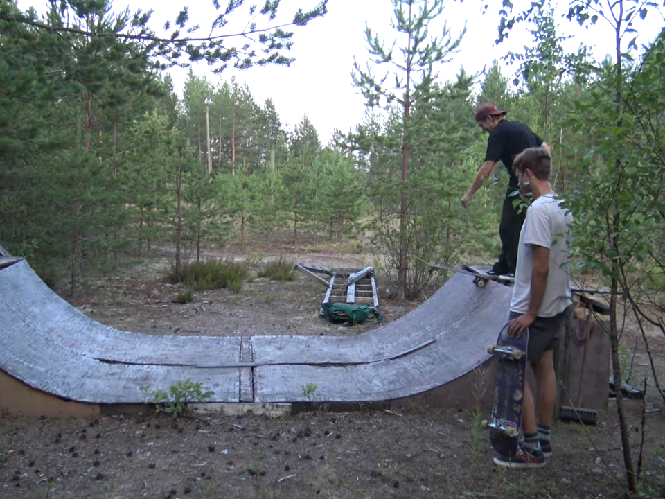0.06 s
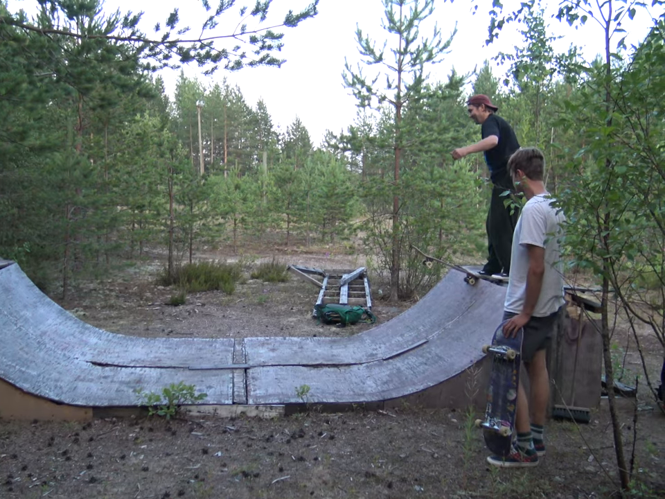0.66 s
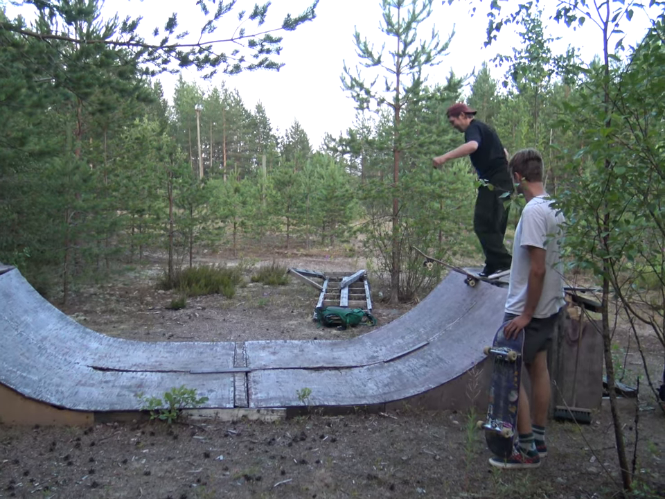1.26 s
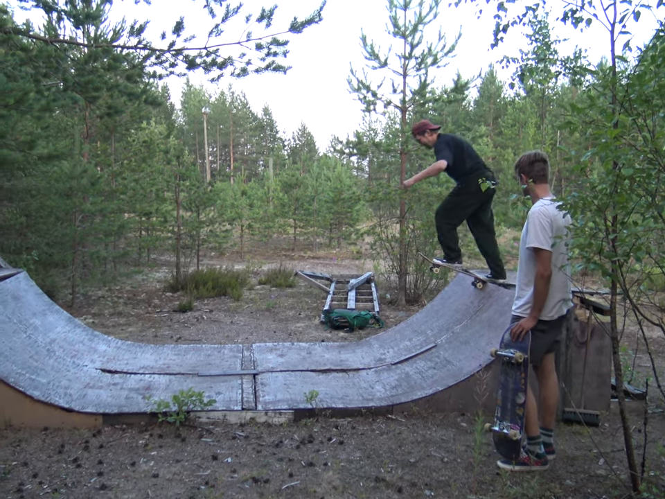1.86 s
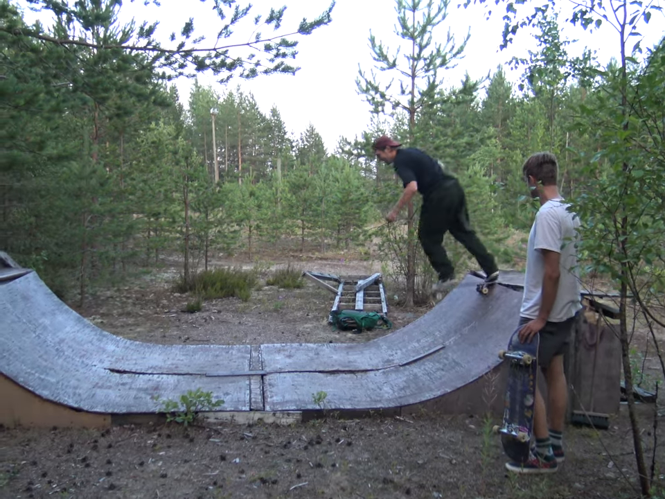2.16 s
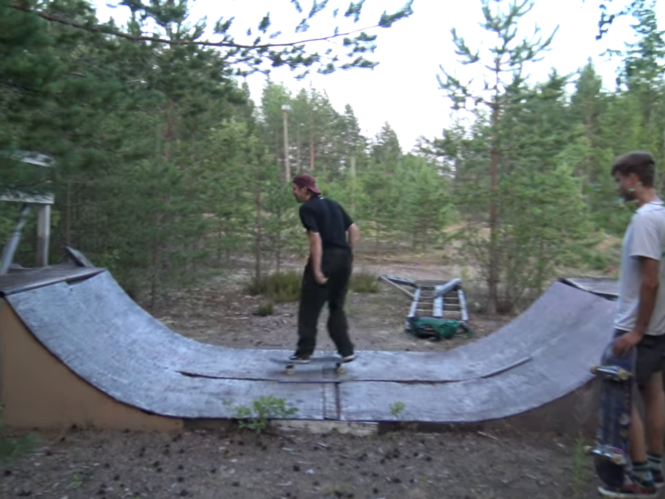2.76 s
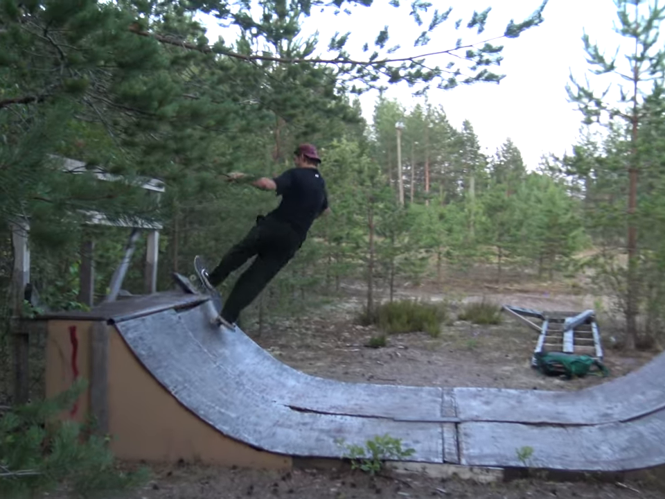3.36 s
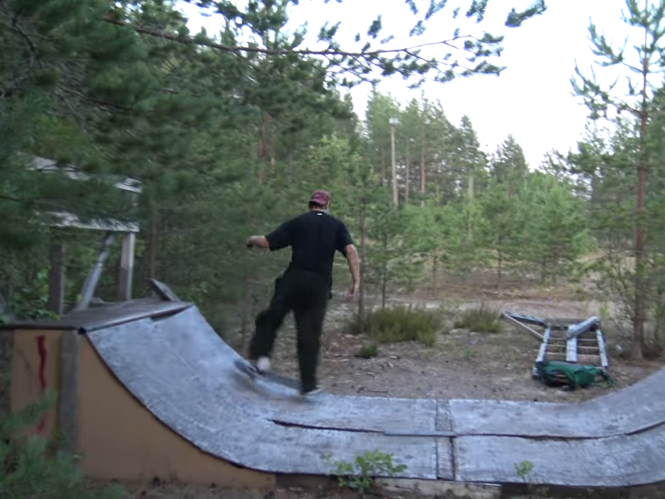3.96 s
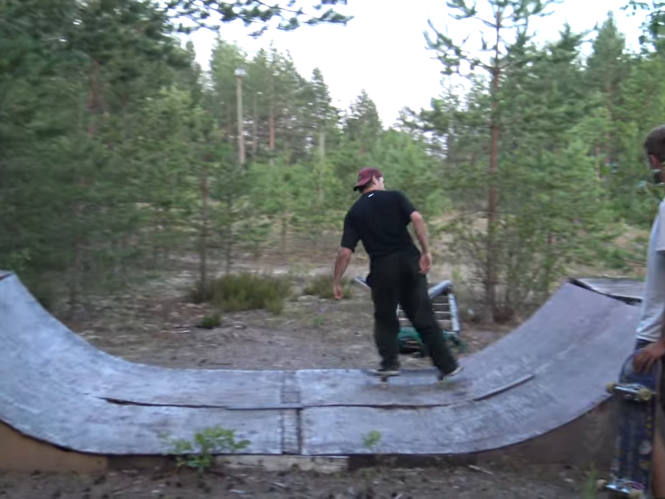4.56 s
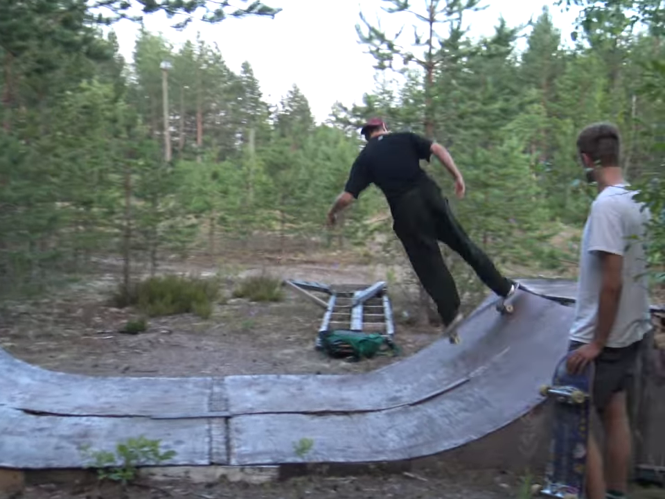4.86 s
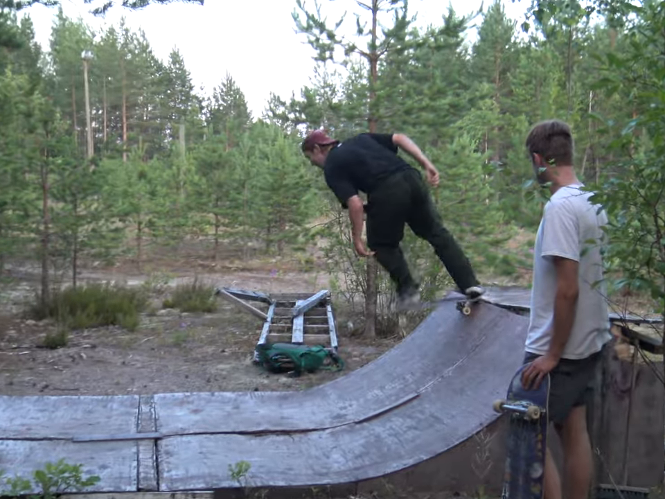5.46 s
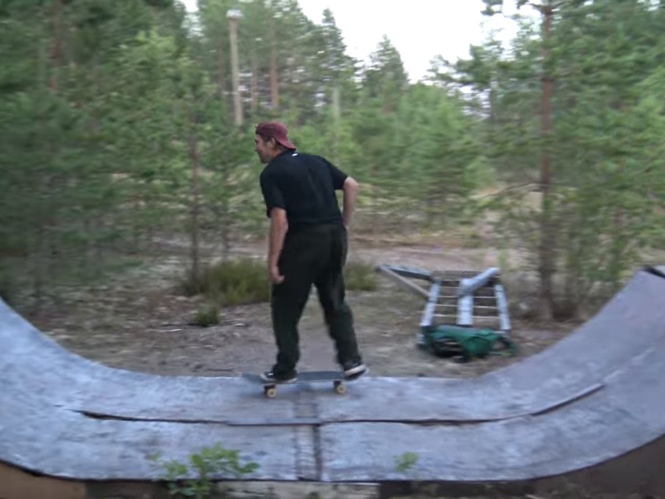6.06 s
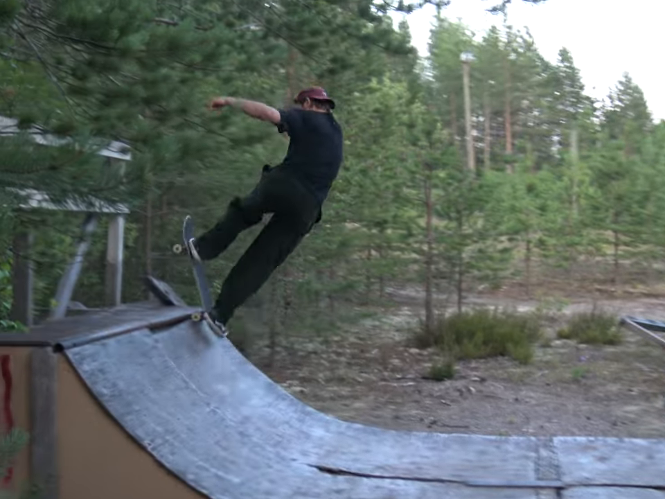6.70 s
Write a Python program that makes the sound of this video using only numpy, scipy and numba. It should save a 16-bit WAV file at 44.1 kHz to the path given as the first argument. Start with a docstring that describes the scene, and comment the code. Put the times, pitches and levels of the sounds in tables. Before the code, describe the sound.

A skateboard clacks onto a plywood ramp, then rolls back and forth, drumming and knocking over a soft distant rush.

```python
"""A wooden clack and a tick of metal: a skateboard is set on the coping of a plywood mini ramp.
The tail scrapes, the rider drops in and rides three passes. The wheels drum the hollow ramp, growl in
its curves and bump over its joints; the bearings rattle; trucks and deck knock and skid at the turns.
A soft distant rush lies behind the forest clearing, and a gain control holds the loud parts down."""
import sys
import numpy as np
from scipy import signal
from scipy.fft import rfft, irfft
from scipy.io import wavfile
from scipy.ndimage import uniform_filter1d
from numba import njit

SR = 44100
rng = np.random.default_rng(int(sys.argv[2]) if len(sys.argv) > 2 else 0)


def store_wav(level_fs):
    """Save 16-bit WAV to argv[1]."""
    pcm = np.round(np.clip(np.atleast_2d(level_fs), -1, 1) * 32767)
    wavfile.write(sys.argv[1], SR, pcm.T.astype(np.int16))


N = 296793
T = np.arange(N) / SR
HIT_T = T[:SR // 2]  # time within one hit

# Cue per pass: first wheels land t/s, all four down t/s, goes light t/s, fade/(dB/s), deck shudder/dB
PASSES = [(2.375, 2.39, 3.292, 137, -19.5), (3.736, 3.898, 4.856, 170, -25), (5.67, 5.77, 6.585, 37, -20.5)]
# Curves pressing on the wheels: t/s, half length/s, growl/dB, drumming f/Hz, side (1 left, -1 right)
CURVES = [(2.54, 0.12, -12.5, 266, -0.23), (3.189, 0.16, -15, 369, 1), (4.01, 0.16, -12.5, 356, 1),
          (4.78, .1, -13.5, 286, 0.31), (5.87, 0.2, -16, 287, -0.068), (6.52, 0.13, -13, 372, 1)]
# Hits of deck, trucks and feet: t/s, wood clack/dB, ramp thud/dB, metal tick/dB, struck panel f/Hz
HITS = [(0.038, -18, -14.5, -23.5, 278), (0.0424, -20.5, -11.5, -46, 246), (0.0979, -17, -22, -31, 130),
        (.11, -25, -15.5, -25, 272), (1.771, -43, -32.5, -42, 227), (2.312, -26, -18.5, -36.5, 154),
        (2.368, -11.5, -14.5, -32, 230), (3.577, -16.5, -19.5, -23, 200), (3.591, -21.5, -18.5, -29, 184),
        (3.731, -16, -19, -40, 340), (5.061, -25, -26, -38.5, 285), (5.076, -32, -27, -29, 350),
        (5.104, -23.5, -19, -28.5, 243), (5.651, -10.5, -10.5, -33, 114)]
# Wheels skidding and truck scraping the coping: t/s, length/s, level/dB, fade/dB (negative swells)
SKIDS = [(2.365, .055, -26.5, -4.5), (2.431, 0.085, -25.5, 16), (3.581, 0.14, -21, 25),
         (3.91, 0.016, -18.5, 22), (5.614, 0.035, -42.5, -9), (5.665, 0.092, -25.5, 4),
         (5.79, 0.06, -32, 16)]
# Small cues: t/s, level/dB
JOINT_BUMPS = [(2.473, -12), (2.535, -13), (2.609, -9.5), (2.674, -27), (2.753, -18), (2.868, -19),
               (3.4, -21.5), (3.905, -6.5), (4.031, -18), (4.492, -16), (4.530, -7.5), (4.647, -8.5),
               (4.845, -36), (6.311, -18.5), (6.619, -24)]  # wheels crossing joints between the sheets
WEIGHT_THUMPS = [(.21, -29.5), (1.033, -31.5), (1.057, -32), (2.052, -25), (3.40, -17), (4.334, -11),
                 (6.11, -16.5), (6.65, -17)]  # boards under the rider's shifting weight
LIGHT_TAPS = [(0.16, -35), (0.282, -43), (1.535, -46), (2.151, -36.5)]  # shoe and deck
TRUCK_TICKS = [(.031, -33), (0.077, -35.5), (.151, -47), (.185, -47), (.226, -50), (.281, -55),
               (.497, -49.5), (1.21, -62), (5.192, -42)]  # trucks and grip tape
TAIL_SWELL = [(1.79, -64), (2.05, -58), (2.22, -47.5), (2.37, -51)]  # level curve of the tail scrape
# The distant rush grows quieter and drifts from the right toward the centre:
# t/s, level/dB, lean to the right (0 to 1)
RUSH_MOVES = [(0, 0, 0.65), (1.4, -3, 0.88), (2.1, -4, .6), (5.2, -5, 0.16)]

# Tone curves: f/Hz, level/dB
RUSH_EQ = [(25, -37), (50, -8), (85, -8), (130, -2.5), (190, -3), (266, -11.5), (394, -5.5), (700, -7),
           (1100, -10.5), (1630, -17), (2300, -27.5), (3600, -37), (7000, -41), (16000, -47.5)]  # distant rush
BOOM_EQ = [(25, -48), (45, -26), (65, -15.5), (90, -2.5), (140, -2.5), (195, 1.5), (280, -8.5), (385, -2),
           (500, -23.5), (800, -24), (1200, -45), (3000, -64)]  # hollow ramp
GROWL_EQ = [(120, -17), (250, -4.5), (390, 6), (510, -0.5), (610, 3), (930, -1), (1110, -12.5),
            (1330, -4.5), (1750, -7.5), (1940, -29), (2110, -9.5), (2900, -17.5), (4200, -34.5),
            (12000, -43)]  # wheels on plywood
BUMP_EQ = [(120, -6), (390, 9), (510, 4.5), (850, 4), (1110, -6), (1350, 2.5), (1750, -14), (1940, -20),
           (2200, -2), (3000, -11.5), (4500, -27), (12000, -33)]  # soft wheel dropping over a joint
CLACK_EQ = [(200, -13), (480, -6.5), (780, 6.5), (950, 0.5), (1150, -10.5), (1400, 0.5), (1900, -8),
            (2200, -4), (3200, -19), (5500, -33), (9000, -38), (16000, -40)]  # struck wood
METAL_EQ = [(800, -18), (2500, -14), (4000, -1), (5800, 1.5), (7000, -2.5), (10500, -2.5), (13000, -5),
            (16000, -11)]  # struck metal
RATTLE_EQ = [(1200, 3), (2400, 4), (3300, 4.5), (5500, -0.5), (8000, -3.5), (10500, -4.5), (13000, -9.5),
             (16000, -20)]  # bearing hiss and tail scrape
SKID_EQ = [(900, 0), (2200, 5), (3000, 0), (4100, -1.5), (5500, -6.5), (7000, -12.5), (14000, -33)]  # slipping wheels
# Stereo tilts: f/Hz, left minus right/dB
RUSH_TILT = [(60, -1), (110, -0.5), (200, -2.5), (380, -4.0), (700, -3), (1290, -2.5), (2380, -1.5),
             (4400, -1), (8120, -6), (15000, 3)]  # the rush leaning right
MIC_TILT = [(60, -1), (110, -2), (200, -0.14), (380, -0.36), (700, -2.6), (1290, -1.97), (2380, -1),
            (4400, -1), (8120, 0), (15000, -1.4)]  # two unlike microphones

# Panel modes of the ramp: f/Hz, level/dB, t60/s
PANEL_MODES = [(95, 0.5, 0.4), (121.5, 0, 0.33), (165, -1, 0.29), (197.5, -2.5, 0.2), (239.5, -3, 0.28),
               (272.8, -0.5, 0.21), (333, -4.5, 0.17), (400, -3, 0.11)]
# Ring-out of a hit in the boards: f/Hz, t60/s
BOARD_DECAY = [(200, 0.39), (600, 0.29), (1500, 0.11), (4000, 0.19), (12000, 0.09)]
# Resonances: f/Hz, width/Hz, level/dB
RACE_MODES = [(3720, 160, -4), (4720, 190, 0), (5880, 830, -3), (6720, 260, -3.5), (9650, 4400, -0.5)]  # bearing races
DECK_MODES = [(613, 65, 3), (820, 76, -2), (1354, 270, -2.5), (2190, 270, -1.5)]  # wooden deck


def undb(db):
    """Decibels to gain."""
    return 10 ** (np.asarray(db) / 20)


def unit(x):
    """Scale to rms 1."""
    return x / np.sqrt(np.mean(x ** 2))


def on_log(hz, points):
    """Read (f/Hz, value) points on a log-frequency axis."""
    f, value = np.transpose(points)
    return np.interp(np.log(np.maximum(hz, 1)), np.log(f), value)


def eq(x, curve, size=4096):
    """Minimum-phase EQ along a tone curve, built from its cepstrum."""
    gain = undb(on_log(np.arange(size // 2 + 1) * SR / size, curve))
    cepstrum = irfft(np.log(gain))
    cepstrum[1:size // 2] *= 2
    cepstrum[size // 2 + 1:] = 0
    return signal.fftconvolve(x, irfft(np.exp(rfft(cepstrum))))[:len(x)]


def tilt(pair, curve):
    """EQ left and right in opposite directions, half the curve each."""
    return np.array([eq(x, [(hz, sign * db / 2) for hz, db in curve]) for x, sign in zip(pair, (1, -1))])


@njit
def bandpass(x, hz, q):
    """State-variable band-pass whose centre can sweep."""
    out, band_state, low_state = np.empty(len(x)), 0., 0.
    for i in range(len(x)):
        g = np.tan(np.pi * hz[i] / SR)
        band = (band_state + g * (x[i] - low_state)) / (1 + g * (g + 1 / q))
        band_state = 2 * band - band_state
        low_state += 2 * g * band
        out[i] = band / q
    return out


def resonate(x, modes):
    """Play a sound through a bank of resonances; rms 1."""
    return unit(sum(undb(db) * bandpass(x, np.full(N, float(hz)), hz / width) for hz, width, db in modes))


def wobble(rate):
    """Smooth random modulation, rate new values a second; rms 1."""
    hold = int(SR / rate)
    steps = np.repeat(rng.standard_normal(N // hold + 1), hold)
    return unit(uniform_filter1d(uniform_filter1d(steps, hold), hold)[:N])


def grains(rate, spread_db=0):
    """Random clicks, rate a second; spread makes a few stand out."""
    clicks = (rng.random(N) < rate / SR) * rng.standard_normal(N)
    return clicks * undb(spread_db * np.minimum(rng.exponential(size=N), 4))


def fader(times, db, edge_s=0.011):
    """Gain along a dB curve, fading to silence just outside it."""
    gate = np.clip(np.minimum(T - times[0], times[-1] - T) / edge_s + 1, 0, 1)
    return undb(np.interp(T, times, db)) * gate


def add(track, t, sound):
    """Mix a sound in at its cue."""
    start = int(t * SR)
    track[start:start + len(sound)] += sound[:N - start]


def dense_ring(decay):
    """Countless close modes: noise whose octave bands die at their own rates."""
    spectrum, out = rfft(rng.standard_normal(len(HIT_T))), 0
    octave = np.log2(np.maximum(np.arange(len(spectrum)) * SR / len(HIT_T), 1))
    for k in range(5, 16):
        band = irfft(spectrum * np.maximum(1 - abs(octave - k), 0), len(HIT_T))
        out = out + band * np.exp(-np.log(1000) * HIT_T / on_log(2 ** k, decay))
    return out


def distant_rush(bed_db=-35, width_db=-17):
    """The bed: a soft rush beyond the clearing, leaning right."""
    mid, side = (unit(eq(rng.standard_normal(N), RUSH_EQ)) for _ in range(2))
    times, *moves = np.transpose(RUSH_MOVES)
    level_db, lean = (np.interp(T, times, move) for move in moves)
    placed = mid + lean * (tilt([mid, mid], RUSH_TILT) - mid)
    width = undb(width_db) * np.array([side, -side])
    return undb(bed_db + level_db) * (placed + width)


def tree_echo(x, wet_db=-24, predelay_s=0.035):
    """Trunks scatter a faint, bright tail, different on each side."""
    tails = [dense_ring([(200, 0.073), (1500, 0.063), (10000, 0.71)]) for _ in range(2)]
    wet = np.array([signal.fftconvolve(x, tail / np.linalg.norm(tail))[:N] for tail in tails])
    return undb(wet_db) * np.pad(wet, ((0, 0), (int(predelay_s * SR), 0)))[:, :N]


def tail_scrape():
    """The tail grinds on the coping, swelling as the rider leans in."""
    return unit(eq(grains(rate=4500), RATTLE_EQ)) * fader(*np.transpose(TAIL_SWELL))


def skids():
    """Short bursts of dense stick-slip clicks from wheels and truck."""
    slips = unit(eq(grains(rate=5600), SKID_EQ))
    return slips * sum(fader([t, t + length], [db, db - fade_db]) for t, length, db, fade_db in SKIDS)


def wheel_load(two_wheels_db=-17, landing_db=-3.5, landing_s=0.037, settle_s=0.035):
    """Weight on the wheels: two land, all four slap down, then the board goes light up the far wall."""
    load = 0
    for land, down, light, db_per_s, _ in PASSES:
        on_two = undb(two_wheels_db) + undb(landing_db) * np.exp(-np.maximum(T - land, 0) / landing_s)
        settled = np.clip((T - down) / settle_s + 1, 0, 1)
        fade = undb(-db_per_s * np.maximum(T - light, 0))
        load = load + (T > land) * (on_two + settled * (1 - on_two)) * fade
    return load


def bearings(load, loaded_db=-34, free_db=-49.5, jolt_db=-14.5, jolt_s=0.059, chatter_db=2.5):
    """Steel balls hiss and click in ringing races: loud under load, jolted by hits, soft when free."""
    balls = rng.standard_normal(N) + undb(-3) * unit(grains(rate=1500, spread_db=2.5))
    races, hiss = resonate(balls, RACE_MODES), unit(eq(balls, RATTLE_EQ))
    jolts = sum(undb(metal_db + jolt_db) * (T > t) * np.exp(-abs(T - t) / jolt_s)
                for t, _, _, metal_db, _ in HITS)
    drive = np.hypot(undb(loaded_db) * load ** 0.62, jolts)
    chatter = undb(chatter_db * wobble(35)) * drive * unit(hiss + undb(-7) * races)
    spinning = T > PASSES[0][0]  # the wheels never stop after the drop-in
    coasting = np.maximum(undb(free_db) * spinning - drive / 2, 0)
    return chatter + coasting * unit(hiss + undb(-1) * races)


def deck_shudder(load, flutter_db=3, attack_s=0.031, decay_s=0.23):
    """The deck rattles in its own resonances after each slap-down, then settles."""
    rattle = resonate(grains(rate=700, spread_db=0.5), DECK_MODES)
    rattle = resonate(rattle, [(hz, width, 0) for hz, width, _ in DECK_MODES])  # sharpens the peaks
    shake = 0
    for _, down, _, _, db in PASSES:
        age = np.maximum(T - down, 0)
        shake = shake + undb(db) * (1 - np.exp(-age / attack_s)) * np.exp(-age / decay_s)
    return undb(flutter_db * wobble(40)) * load * shake * rattle


def impact(tone, crack_s, ring_db):
    """A crack of contact, then the ring of the boards; rms 1 over the first 10 ms."""
    crack = rng.standard_normal(len(HIT_T)) * np.exp(-HIT_T / crack_s)
    hit = eq(crack + undb(ring_db) * dense_ring(BOARD_DECAY), tone)
    return hit / np.sqrt(np.mean(hit[:SR // 100] ** 2))


def ramp_thud(panel_hz, reach_octaves=0.8, attack_s=0.00045, detune=0.022):
    """Low body of a hit: the panels swing, favouring the modes near the struck spot's pitch."""
    hz, db, t60 = np.transpose(PANEL_MODES)[:, :, None]
    scatter, phase = rng.standard_normal((2, len(PANEL_MODES), 1))
    gains = undb(db) / (1 + (np.log2(hz / panel_hz) / reach_octaves) ** 2)
    tones = np.sin(2 * np.pi * (hz * (1 + detune * scatter) * HIT_T + phase))
    modes = gains * np.exp(-np.log(1000) * HIT_T / t60) * tones
    return modes.sum(0) * (1 - np.exp(-HIT_T / attack_s)) / np.sqrt(np.sum(gains ** 2) / 2)


def knocks():
    """Layered one-shots: board on coping and plywood, wheels over joints, feet on the platform."""
    out = np.zeros(N)
    for t, wood_db, ramp_db, metal_db, panel_hz in HITS:
        add(out, t, undb(wood_db) * impact(CLACK_EQ, crack_s=0.0076, ring_db=-6.5))
        add(out, t, undb(ramp_db) * ramp_thud(panel_hz))
        add(out, t, undb(metal_db) * impact(METAL_EQ, crack_s=0.0036, ring_db=-10.5))
    for t, db in JOINT_BUMPS:
        add(out, t, undb(db) * impact(BUMP_EQ, crack_s=0.0043, ring_db=-16.5))
        add(out, t, undb(db - 7) * ramp_thud(panel_hz=220))
    for t, db in WEIGHT_THUMPS:
        add(out, t, undb(db) * ramp_thud(panel_hz=153))
    for t, db in LIGHT_TAPS:
        add(out, t, undb(db) * impact(CLACK_EQ, crack_s=0.0071, ring_db=-32))
    for t, db in TRUCK_TICKS:
        add(out, t, undb(db) * impact(METAL_EQ, crack_s=0.002, ring_db=-2))
    return out


def rolling(load, boom_db=-11.5, drum_db=-15.5, growl_db=-20.5, flat_hz=220, drum_q=3.2):
    """Bumps and grit make the hollow ramp boom, the sheet underneath drum and the wheels growl."""
    bend, growl_gain, drum_hz = 0, undb(growl_db), flat_hz
    for t, half_s, curve_db, curve_hz, _ in CURVES:
        depth = np.exp(-abs((T - t) / half_s) ** 2.83)  # how far into this curve, 0 to 1
        bend = bend + depth
        growl_gain = growl_gain + depth * (undb(curve_db) - undb(growl_db))
        drum_hz = drum_hz + depth * (curve_hz - flat_hz)  # bent sheets are stiffer: higher pitch
    drum_hz = drum_hz * (1 - 0.15 * (1 - np.minimum(load, 1)))  # pitch sags as the board goes light
    boom = undb(boom_db - 2.5 * bend) * unit(eq(rng.standard_normal(N), BOOM_EQ))  # less when bent
    sheet = bandpass(bandpass(rng.standard_normal(N), drum_hz, drum_q), drum_hz, drum_q)
    drum = undb(drum_db) * unit(sheet / np.sqrt(drum_hz))
    grit = rng.standard_normal(N) + undb(-3) * unit(grains(rate=900, spread_db=2.5))
    patchy_grit = grit * undb(2.5 * wobble(120))
    growl = growl_gain * unit(eq(patchy_grit, GROWL_EQ))
    return load * (boom + drum) + load ** 0.95 * growl


def scene(centre_db=0.74, swing_db=1.24):
    """The mix: the board pans gently from wall to wall, over its echo and the bed."""
    load = wheel_load()
    board = rolling(load) + deck_shudder(load) + bearings(load) + knocks() + skids() + tail_scrape()
    times, *_, side = np.transpose(CURVES)
    pan_db = centre_db + swing_db * np.interp(T, times, side)  # left minus right
    return board * undb(np.array([pan_db, -pan_db]) / 2) + tree_echo(board) + distant_rush()


@njit
def follow(x, attack, release):
    """Envelope follower: rises fast, sinks slowly."""
    out, level = np.empty(len(x)), 0.
    for i in range(len(x)):
        level += (x[i] - level) * (attack if x[i] > level else release)
        out[i] = level
    return out


def limit(x, threshold_db, attack_s, release_s):
    """Duck both channels by as much as their envelope exceeds the threshold."""
    peak = follow(abs(x).max(0), 1 / (1 + attack_s * SR), 1 / (1 + release_s * SR))
    return x * np.minimum(undb(threshold_db) / (peak + 1e-9), 1)


def record(dry, ceiling=0.67, high_cut_hz=15700):
    """The chain: two unlike microphones, slow gain control, quick limiter, soft clip, high cut."""
    levelled = limit(tilt(dry, MIC_TILT), threshold_db=-4.0, attack_s=0.026, release_s=3.3)
    limited = limit(levelled, threshold_db=-4.5, attack_s=0.00056, release_s=0.028)
    rounded = limited / (1 + (limited / ceiling) ** 6) ** (1 / 6)
    return signal.sosfilt(signal.ellip(8, 0.2, 70, high_cut_hz, fs=SR, output="sos"), rounded)


dry = scene()
out = record(dry)
store_wav(out)
```